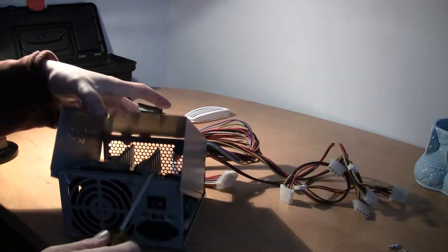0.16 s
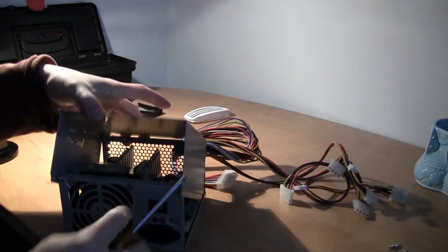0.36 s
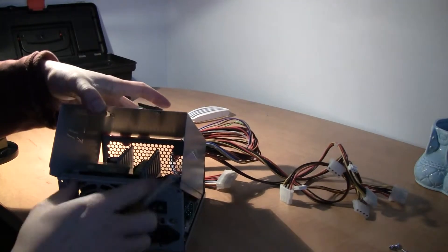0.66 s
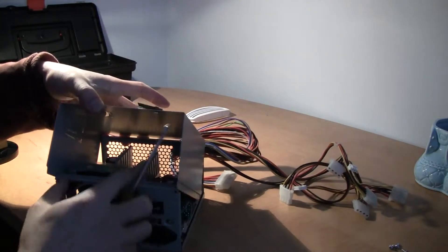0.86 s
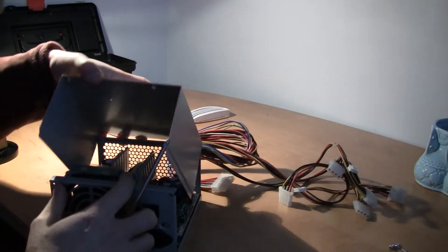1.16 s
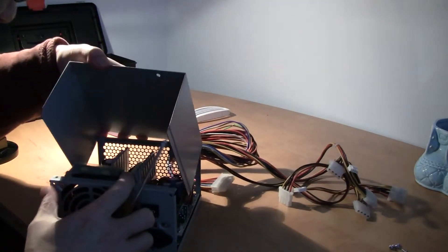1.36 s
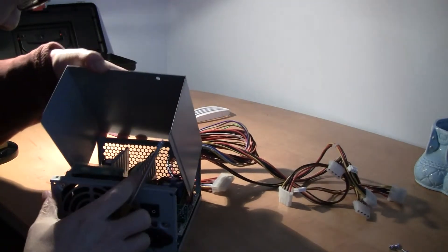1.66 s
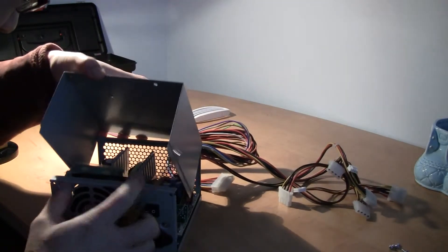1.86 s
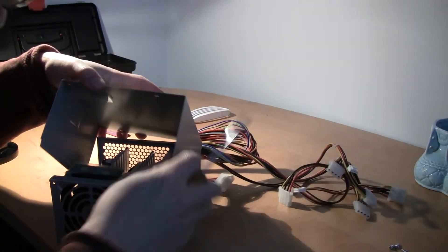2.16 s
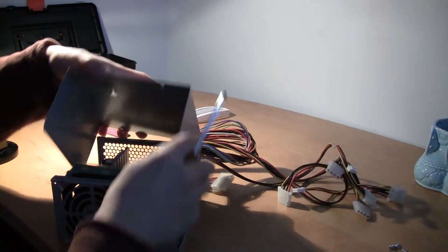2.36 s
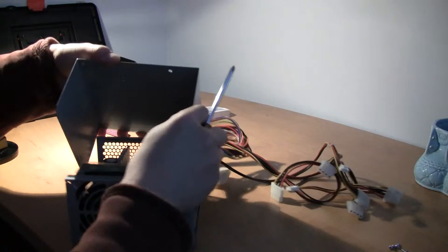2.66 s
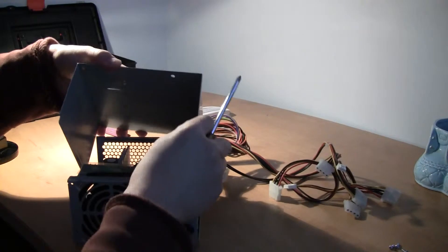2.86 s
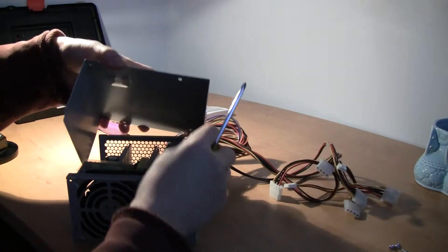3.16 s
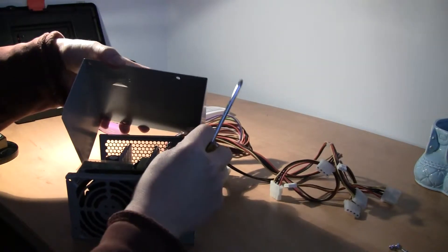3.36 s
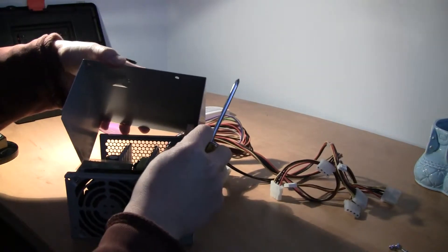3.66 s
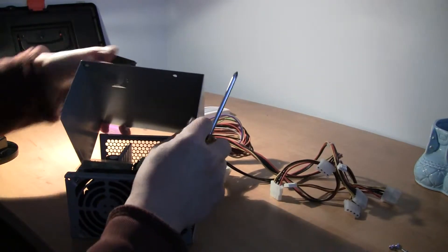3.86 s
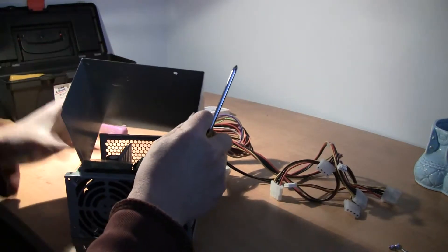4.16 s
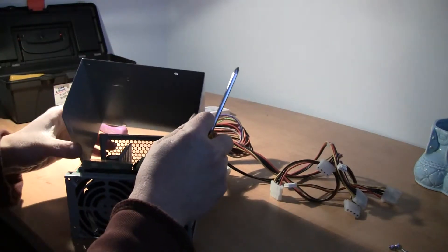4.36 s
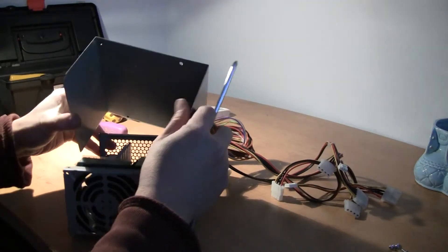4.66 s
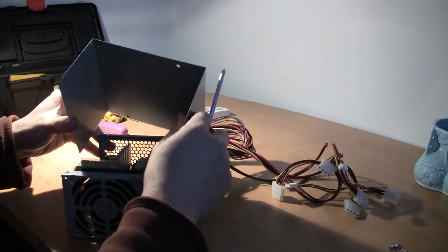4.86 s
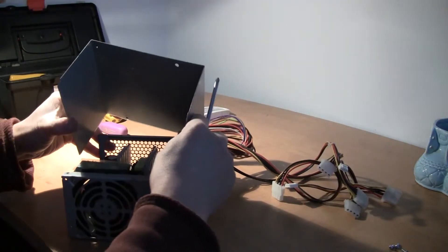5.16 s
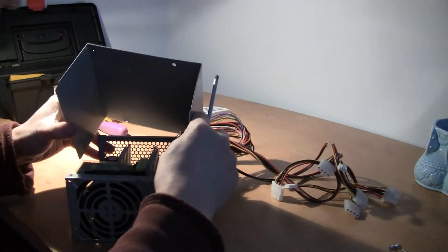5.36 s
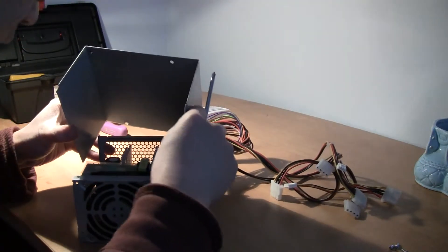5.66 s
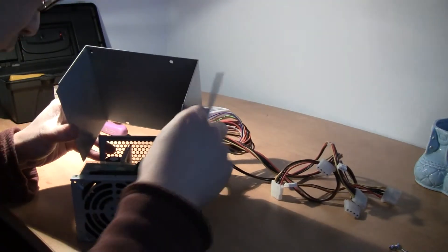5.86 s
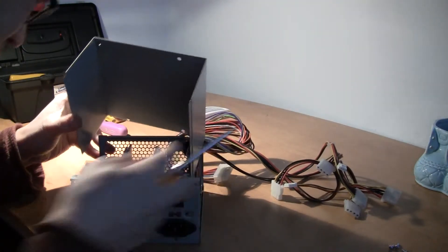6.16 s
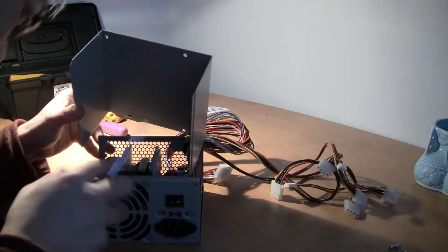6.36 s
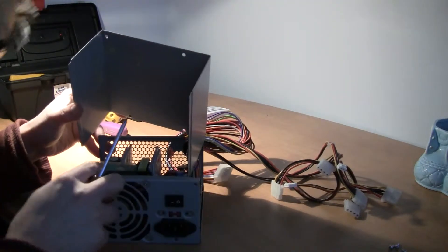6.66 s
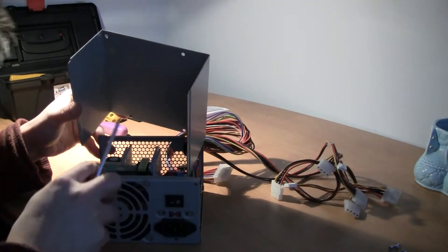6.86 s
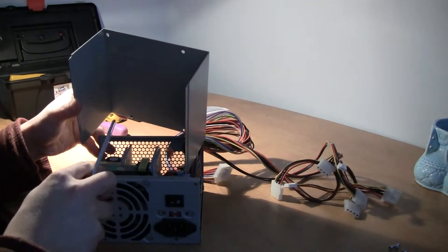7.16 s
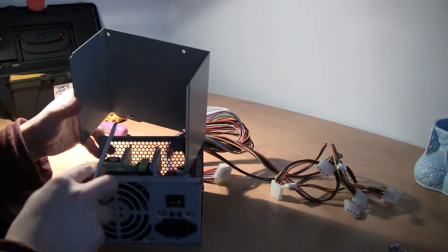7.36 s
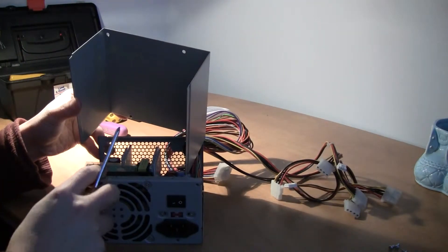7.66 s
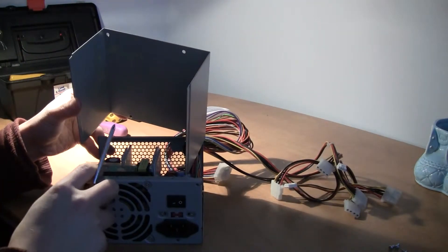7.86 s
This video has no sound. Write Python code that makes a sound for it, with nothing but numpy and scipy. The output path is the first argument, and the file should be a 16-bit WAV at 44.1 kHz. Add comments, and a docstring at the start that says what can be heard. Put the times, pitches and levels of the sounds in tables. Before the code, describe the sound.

A thin steel cover is worked off a small metal case on a wooden desk, heard close in a small bare room over a soft steady hiss. Light scrapes and clinks start at once, with a sharper catch at 0.6 seconds. From about 1 to 1.3 seconds the edges chatter in a cluster of bright, briefly ringing clinks. Hands rub softly on the sheet, then a clink and scrape come at 2.4 seconds and a dull desk bump at 2.7. Between 3 and 5 seconds the handling is quieter, with finger swishes, faint high squeaks, small ticks and short scrapes. A screwdriver knocks on the case at 5.1 seconds, and the cover rattles briefly just after. Two louder, ringing screwdriver knocks follow at about 6.2 and 6.9 seconds, and then only the hiss remains.

```python
"""Clinks and scrapes as a thin steel cover is worked off a small metal case on a wooden desk.
Edges catch, chatter and ring the sheet's modes; sliding steel sticks and slips, at times with a squeak.
Hands rub, swish and bump, and late on a screwdriver knocks three times on the stiffer case.
A small, bare room answers the contacts over a soft steady hiss."""
import sys
import numpy as np
from scipy import signal
from scipy.fft import rfft, irfft, next_fast_len
from scipy.io import wavfile
from scipy.ndimage import uniform_filter1d, map_coordinates

SR = 44100
rng = np.random.default_rng(int(sys.argv[2]) if len(sys.argv) > 2 else 0)


def wrap_up_sound(samples):
    """Save the sound to the file named by the first command line argument, as 16-bit audio."""
    columns = np.atleast_2d(samples).T
    # keep every value between -1 and 1, then stretch to whole-number steps
    tamed = np.clip(columns, -1, 1)
    steps = np.round(tamed * 32767).astype(np.int16)
    wavfile.write(sys.argv[1], SR, steps)


N = 352800
RING_N = SR // 2
RING_T = np.arange(RING_N) / SR

# steel modes: (frequency [Hz], level [dB], t60 [s])
COVER_MODES = [(215, -19, .2), (422, -10, .18), (502, -9, .21), (582, -10, .25), (722, -13, .16),
               (780, -16, .16), (925, -9, .21), (960, -8, .22), (1160, -16, .14), (1540, -6, .2),
               (1605, -7, .15), (1750, -3, .19), (1935, -14, .13), (2290, -13, .17), (2385, -12, .15),
               (2560, -14, .09), (2690, -17, .15), (2780, -19, .15), (3110, -15, .13), (3205, -10, .15),
               (3410, -18, .17), (3610, -9, .08), (3770, -7, .075), (3840, -12, .045), (4340, -14, .09),
               (4620, -17, .17), (5315, -16, .15), (5865, -14, .07), (6100, -16, .075), (6820, -17, .16),
               (6930, -14, .1), (7190, -9, .06), (7565, -16, .14), (8110, -13, .07), (10060, -17, .1),
               (11320, -17, .1), (11850, -18, .14), (13450, -21, .14)]
CASE_MODES = [(171.6, -7, .13), (213, -7, .17), (345, -2, .19), (507, -3, .26), (584, -4, .18),
              (717, -3.5, .18), (824, -7, .15), (1310, -5, .1), (1418, -5, .13), (1560, -3, .2),
              (1655, -5, .12), (1785, 0, .18), (2280, -11, .18), (3125, -8, .23), (3235, -9, .25),
              (3533, -6, .2), (3850, -5, .12), (4190, -6, .14), (5325, -9, .21), (7140, -5, .14),
              (7565, -10, .18), (8060, -4, .12), (8180, -7, .15), (9540, -8, .12), (9997, -5, .13),
              (10550, -7, .14), (11285, -3, .09), (13445, -14, .14)]
# contact spectra: (frequency [Hz], level [dB])
COVER_COLOUR = [(60, -36.5), (130, -45), (220, 0), (420, 3.5), (800, -1), (1200, -4), (1680, 11),
                (2200, 2.5), (2850, -1.5), (3700, 6.5), (5000, -2.5), (7600, -0.5), (9000, -2.5),
                (11300, 3), (14000, -2.5), (16000, -10)]
CASE_COLOUR = [(60, -24), (120, -18), (200, 0.5), (330, 4.5), (450, 2), (720, 7), (950, 7), (1400, 9),
               (1800, 5.5), (2500, -2), (3400, 1), (4000, 2), (4700, -4.5), (7600, -1), (9000, -2.5),
               (11300, 3), (13500, 1.5), (16000, -9)]
# stereo width of skin noise: (frequency [Hz], side minus mid [dB])
SKIN_WIDTH = [(100, -19), (400, -24), (1500, -20), (6000, -3)]


def amp(db):
    """dB to gain."""
    return 10 ** (np.asarray(db) / 20)


def unit(x):
    """Scale to rms 1."""
    return x / np.sqrt(np.mean(x ** 2) + 1e-20)


def along(points, hz):
    """Interpolate (frequency [Hz], value) points on a log axis."""
    knots_hz, values = np.transpose(points)
    return np.interp(np.log(hz + 1), np.log(knots_hz + 1), values)


def filtered(x, response):
    """Apply the gain response(hz) by FFT."""
    n = x.shape[-1]
    n_fft = next_fast_len(n + 4096)
    return irfft(rfft(x, n_fft) * response(np.fft.rfftfreq(n_fft, 1 / SR)), n_fft)[..., :n]


def coloured(x, colour):
    """Apply a (frequency [Hz], level [dB]) curve."""
    return filtered(x, lambda hz: amp(along(colour, hz)))


def add(track, start_s, sound):
    """Mix sound into track from start_s on."""
    start = round(start_s * SR)
    part = sound[:, max(-start, 0):N - start]
    track[:, max(start, 0):][:, :part.shape[1]] += part


def diffuse(colour, width, n):
    """Stereo noise from all sides, mid rms 1."""
    mid, side = coloured(rng.standard_normal((2, n)), colour)
    side = coloured(side, width)
    return np.array([mid + side, mid - side]) / np.std(mid)


def room_hiss():
    """Steady diffuse room noise."""
    # spectrum: (frequency [Hz], density [dB])
    colour = [(15, -40), (25, -18), (70, -15), (94, -9), (223, -0.5), (263, -0.5), (317, 1.5), (476, -3),
              (516, 1), (624, -4), (818, -3), (3620, -16), (4740, -20), (11600, -29.5), (16000, -36.5)]
    # stereo width: (frequency [Hz], side minus mid [dB])
    width = [(60, -11), (130, -2.5), (290, 4.5), (640, 6.5), (1410, 2.5), (3100, -0.5), (6820, -3),
             (15000, 1)]
    return amp(-58.5) * diffuse(colour, width, N)


def mic_pair(hz, lobe_hz=300, beaming_per_10khz=.11):
    """Left and right gains: modes beam in different directions, more unevenly in the treble."""
    # balance: (frequency [Hz], left minus right [dB])
    lean = [(60, -2.5), (110, 3.5), (200, 1), (380, 0.5), (700, 0), (1290, 0), (2380, 0.5), (4400, -0.5),
            (8120, -1), (15000, 2.5)]
    # phase: (frequency [Hz], left lead [rad])
    lead = [(100, 0.34), (2000, 0.098), (4000, 0.192), (7000, .8), (11000, 1.1), (15000, 1.7)]
    knots = rng.standard_normal((2, SR // lobe_hz))
    level, phase = (map_coordinates(row, [hz / lobe_hz]) for row in knots)
    lobes = np.exp(beaming_per_10khz * hz / 10000 * (level + 1j * phase))
    left = amp(along(lean, hz) / 2) * np.exp(.5j * along(lead, hz)) * lobes
    return np.array([left, 1 / left])


def in_room(x, wet_db=0, build_s=0.00098, widen_s=.05):
    """Direct sound plus a fresh room tail that dies sooner in the treble."""
    # decay: (frequency [Hz], t60 [s])
    decay = [(150, 0.31), (700, 0.37), (3000, 0.32), (8000, 0.33), (14000, 0.22)]
    # tail spectrum: (frequency [Hz], level before wet_db [dB])
    colour = [(150, 8), (500, 1), (1500, -6), (5000, -13), (12000, -17)]
    # late tail width: (frequency [Hz], side minus mid [dB])
    width = [(100, -9.5), (300, -23), (700, -7.5), (1500, -8.5), (4000, -6), (12000, 4)]
    hz, t, bins = signal.stft(diffuse([(20, 0), (20000, 0)], width, RING_N), SR, nperseg=256)
    mid = bins.mean(axis=0)
    bins = mid + (bins - mid) * (1 - np.exp(-t / widen_s))  # desk echoes first, then all around
    fade = amp(-60 * t / along(decay, hz)[:, None]) * (1 - np.exp(-t / build_s))
    fade *= amp(along(colour, hz))[:, None] / np.sqrt(RING_N * np.mean(fade ** 2, axis=1, keepdims=True))
    tail = signal.istft(bins * fade, SR, nperseg=256)[1]
    echo = signal.fftconvolve(x[None], tail, axes=1)[:, :len(x)]
    return filtered(x, mic_pair) + amp(wet_db) * echo


def radiated(x):
    """A small open sheet radiates almost no bass."""
    return signal.sosfilt(signal.butter(3, 140, "high", fs=SR, output="sos"), x)


def voiced(x, level_db, tilt_db_oct, thud_db, bite_db):
    """Set the crest of four bands: hard contacts tilt up, heavy ones thud, sharp edges bite."""
    octaves = np.log2(np.array([1300, 3900, 10000]) / 1300)  # upper three bands
    crests_db = level_db + np.append(thud_db, tilt_db_oct * octaves) + [0, 0, bite_db, 0]
    out = 0
    for split_hz, db in zip((700, 2500, 6000, None), crests_db):
        band = x
        if split_hz:
            crossover = [signal.butter(2, split_hz, kind, fs=SR, output="sos") for kind in ("low", "high")]
            band, x = (signal.sosfilt(np.tile(sos, (2, 1)), x) for sos in crossover)
        crest_power = uniform_filter1d(np.mean(band ** 2, axis=0), size=441).max()
        out = out + band * amp(db) / np.sqrt(crest_power + 1e-20)
    return out


def dense_modes(t60_s, colour=COVER_COLOUR):
    """Short-lived bending modes, too close to tell apart: decaying noise."""
    return amp(-60 * RING_T / t60_s) * unit(coloured(rng.standard_normal(RING_N), colour))


def ringing(modes, scatter_db=2.5):
    """Lasting modes, with new levels and phases at each contact."""
    hz, db, t60_s = np.transpose(modes)[:, :, None]
    db = db + rng.normal(0, scatter_db, hz.shape)
    phase = 2 * np.pi * (hz * RING_T + rng.random(hz.shape))
    return np.sum(amp(db - 60 * RING_T / t60_s) * np.sin(phase), axis=0)


def singing(modes, struck, push, blur_hz=4.9):
    """Modes with an antinode at the contact ring out; struck: (frequency [Hz], level [dB])."""
    if not struck:
        return 0
    out = 0
    for near_hz, db in struck:
        hz, _, t60_s = min(modes, key=lambda mode: abs(mode[0] - near_hz))
        energy = signal.lfilter([1], [1, -amp(-60 / (t60_s * SR)) ** 2], push ** 2)
        linewidth_hz = blur_hz + .004 * hz  # loose contact blurs the mode
        drift = uniform_filter1d(rng.standard_normal(len(push)), size=200)
        phase = np.cumsum(2 * np.pi * hz / SR + np.sqrt(2 * np.pi * linewidth_hz / SR) * drift)
        out = out + amp(db) * np.sqrt(energy / energy.max()) * np.sin(phase)
    return in_room(radiated(out), wet_db=-7.5)  # drier, so the tones sound clear and steady


def swell(rise_s, fall_s):
    """Slide pressure: up 60 dB, then down."""
    t = np.arange(2 * RING_N) / SR - rise_s
    return amp(-60 * np.maximum(-t / rise_s, t / fall_s))


def slips(n, rate_hz, spread_db):
    """Stick-slip jerks of random time and size."""
    jerks = (rng.random(n) < rate_hz / SR) * rng.standard_normal(n)
    return jerks * amp(spread_db * rng.standard_normal(n))


def chatter(span_s, rebound=0.89, count=5):
    """First touch, then ever weaker rebounds within span_s."""
    when = np.append(0, rng.uniform(0, 1, count))
    size = np.append(1, rebound * (1 - when[1:]))
    return np.bincount((when * span_s * SR).astype(int), size, RING_N)


def clack(span_s, t60_s, colour, cutoff_hz):
    """Chatter drives the dense modes up to a cut-off set by contact hardness."""
    bins = rfft(signal.fftconvolve(chatter(span_s), dense_modes(t60_s, colour))[:RING_N])
    hz = np.fft.rfftfreq(RING_N, 1 / SR)
    whitened = bins / np.sqrt(np.abs(uniform_filter1d(np.abs(bins) ** 2, size=130)) + 1e-12)
    softness = np.sqrt(1 + (hz / cutoff_hz) ** 10)
    sound = irfft(whitened * amp(along(colour, hz)) / softness, RING_N)
    return unit(sound * (RING_T < RING_T[-1] / 2))


def blows(contacts, modes, colour, dense_t60_s, ring_db, attack_s, wet_db, gain_db):
    """Each contact chatters and sets steel and room ringing."""
    out = np.zeros((2, N))
    for time_s, level_db, tilt_db_oct, thud_db, bite_db, cutoff_hz, span_s, struck in contacts:
        hit = clack(span_s, dense_t60_s, colour, cutoff_hz) + amp(ring_db) * unit(ringing(modes))
        hit *= 1 - np.exp(-RING_T / attack_s)
        hit = voiced(in_room(radiated(hit), wet_db), level_db + gain_db, tilt_db_oct, thud_db, bite_db)
        push = np.exp(-RING_T / (0.27 * span_s))  # panels take up energy early in the chatter
        add(out, time_s, hit + singing(modes, struck, push))
    return out


def finger_swishes():
    """Dry skin glides over the flat sheet with a soft hiss."""
    # glides: (peak time [s], rise [s], fall [s], level [dB])
    glides = [(2.99, .25, .25, -74), (3.63, 0.28, .33, -59)]
    # spectrum: (frequency [Hz], density [dB])
    colour = [(800, -25), (2000, -7), (2600, -2), (3200, 3), (4200, -10), (6000, -22), (12000, -35)]
    out = np.zeros((2, N))
    for peak_s, rise_s, fall_s, db in glides:
        pressure = swell(rise_s, fall_s)
        add(out, peak_s - rise_s, amp(db) * pressure * diffuse(colour, SKIN_WIDTH, len(pressure)))
    return out


def grip(start_s, hold_s, attack_s=0.046, release_t60_s=0.4):
    """Pressure of one finger stroke: tighten, hold, release."""
    t = np.arange(N) / SR - start_s
    return np.clip(1 + t / attack_s, 0, 1) * amp(-60 * np.clip((t - hold_s) / release_t60_s, 0, 2))


def waver(depth_db=1.43, rate_hz=18):
    """Random gain of uneven finger pressure."""
    position = np.arange(N) * rate_hz / SR
    return amp(depth_db * map_coordinates(rng.standard_normal(int(position[-1]) + 2), [position]))


def hand_rubs(ring_db=-17):
    """Skin rubs dully on the sheet; its raw edge gives a fine crackle."""
    # grip changes: (start [s], hold [s], rub [dB], grit [dB])
    strokes = [(0.197, 0.053, -65, -55.5), (0.572, 0.022, -49.5, -57), (0.936, 0.096, -45.5, -54),
               (1.146, 0.17, -81, -56), (1.51, 0.094, -74, -64.5), (1.797, 0.26, -67, -69),
               (2.205, 0.21, -59.5, -64.5), (2.515, 0.22, -48.5, -62.5), (2.873, 0.19, -79, -71),
               (3.122, 0.08, -55.5, -80), (3.382, 0.033, -61, -63), (3.607, 0.35, -59, -65.5),
               (4.427, 0.28, -59.5, -62.5), (4.878, 0.13, -77, -65.5), (5.16, 0.36, -64.5, -77),
               (5.696, 0.34, -64.5, -76), (6.096, 0.021, -71, -67), (6.684, 0.025, -75.5, -63)]
    # spectra: (frequency [Hz], density [dB])
    rub_colour = [(47, -56), (80, -23), (135, -32), (216, -0.5), (371, -2.5), (594, -0.5), (650, -0.5),
                  (1600, -4), (2480, -17.5), (6000, -29.5), (7800, -69), (13200, -120)]
    grit_colour = [(700, -27.5), (1200, 9), (2000, -2.5), (3500, 2), (5200, -1), (8000, 2.5), (11500, 0),
                   (14000, -1.5), (16000, -8)]
    rub_gain, grit_gain = waver() * sum(amp([[rub_db], [grit_db]]) * grip(start_s, hold_s)
                                        for start_s, hold_s, rub_db, grit_db in strokes)
    sheet = dense_modes(t60_s=0.076) + amp(ring_db) * ringing(COVER_MODES)
    crackle = signal.fftconvolve(slips(N, rate_hz=500, spread_db=4), sheet)[:N]
    grit = unit(in_room(coloured(crackle, grit_colour)))
    return rub_gain * diffuse(rub_colour, SKIN_WIDTH, N) + grit_gain * grit


def desk_bumps(tilt_db_oct=-30, cutoff_hz=4100, span_s=0.00297):
    """Hand and case meet the desk: soft contacts, little treble."""
    # bumps: (time [s], level [dB], thud [dB])
    bumps = [(0.266, -39, -4.5), (.811, -62, 15), (1.645, -50.5, 5.5), (2.6945, -38, 3),
             (2.713, -48.5, 7.5), (2.741, -57, 12.5), (3.244, -53, 7.5), (3.359, -54, 11),
             (3.383, -59.5, 12), (3.441, -53.5, 1.5), (4.743, -58.5, 8.5), (5.573, -56.5, 7.5),
             (5.756, -62, 12)]
    contacts = [(time_s, db, tilt_db_oct, thud_db, 0, cutoff_hz, span_s, [])
                for time_s, db, thud_db in bumps]
    return blows(contacts, CASE_MODES, CASE_COLOUR,
                 dense_t60_s=0.064, ring_db=-21, attack_s=0.00026, wet_db=0, gain_db=-2.5)


def edge_squeaks():
    """A slipping edge drives one or two high modes."""
    # squeaks: (peak time [s], rise [s], fall [s], struck modes [(frequency [Hz], level [dB])])
    squeaks = [(2.52, .12, .1, [(13450, -67)]), (2.96, 0.17, 0.11, [(11850, -76), (13450, -76)]),
               (3.645, 0.28, 0.088, [(13450, -61)])]
    out = np.zeros((2, N))
    for peak_s, rise_s, fall_s, struck in squeaks:
        add(out, peak_s - rise_s, singing(COVER_MODES, struck, swell(rise_s, fall_s), blur_hz=60))
    return out


def cover_scrapes(ring_db=-8, thud_db=-9, gain_db=-1):
    """The lip drags over the case: a swell of slips rings the sheet but hardly moves it as a whole."""
    # slides: (peak time [s], rise [s], fall [s], level [dB], tilt [dB/oct], bite [dB],
    # struck modes [(frequency [Hz], level [dB])])
    slides = [(0.017, 0.23, 0.24, -38, -1.5, 1.5, [(925, -40.5), (5865, -45)]),
              (.23, .1, 0.057, -41.5, -3.5, -3, [(925, -47.5), (1750, -39.5), (2780, -49.5), (3610, -46),
              (4620, -54)]), (.335, 0.12, 0.081, -43, -4.5, -2, [(925, -44), (1750, -58), (1935, -52),
              (2290, -51), (2690, -54), (3770, -53), (4620, -54)]),
              (.423, 0.19, 0.18, -48.5, -5, -7, [(925, -59), (1750, -50.5), (2690, -61), (4620, -63)]),
              (.967, 0.14, .049, -41, -1, 3.5, [(960, -38.5), (1750, -34.5)]),
              (2.414, 0.053, 0.015, -46, -3, -2, []), (2.49, 0.14, 0.12, -58, -2.5, -2, [(1750, -57),
              (3770, -64)]), (2.573, 0.074, 0.14, -58, -0.5, 3.5, [(1605, -55), (3770, -68)]),
              (3.835, 0.15, 0.017, -51, -2, -4, [(780, -46.5), (1160, -54), (1750, -54), (2385, -54.5),
              (3770, -56)]), (4.463, 0.13, 0.066, -55, -6, 1, [(1750, -57), (3770, -63)]),
              (2.98, .33, 0.37, -73, -1.5, 6, [(3610, -69), (3770, -70)]),
              (4.905, .15, 0.083, -63.5, -1.5, 0, [(1935, -63), (3770, -71)])]
    # sliding force, softer than a blow: (frequency [Hz], level [dB])
    drag_colour = [(100, -30), (6500, 2), (11000, 0.5), (13000, -7), (16000, -8)]
    out = np.zeros((2, N))
    for peak_s, rise_s, fall_s, level_db, tilt_db_oct, bite_db, struck in slides:
        pressure = swell(rise_s, fall_s)
        drag = coloured(pressure * slips(len(pressure), rate_hz=9000, spread_db=7), drag_colour)
        sheet = dense_modes(t60_s=0.078) + amp(ring_db) * ringing(COVER_MODES)
        scrape = signal.fftconvolve(drag, sheet)[:len(drag)]
        scrape = voiced(in_room(radiated(scrape)), level_db + gain_db, tilt_db_oct, thud_db, bite_db)
        add(out, peak_s - rise_s, scrape + singing(COVER_MODES, struck, pressure))
    return out


def screwdriver_knocks():
    """The tool strikes and rings the stiff case."""
    # knocks: (time [s], level [dB], tilt [dB/oct], thud [dB], bite [dB], cut-off [Hz], chatter [s],
    # struck modes [(frequency [Hz], level [dB])])
    knocks = [(5.1032, -30.5, -0.5, -10, 1.8, 13100, 0.0091, [(345, -42.5), (507, -45), (717, -43),
              (1310, -45), (1560, -60), (1785, -42), (2280, -45), (3125, -48.5), (3850, -46)]),
              (6.213, -25.5, 1, -7.5, 0.61, 9900, .011, [(345, -42.5), (717, -38.5), (1418, -40),
              (1785, -27.5), (3533, -48), (3850, -37), (4190, -42), (5325, -42), (8060, -41)]),
              (6.9298, -26, 4, -2, -0.85, 16000, .015, [(213, -44.5), (345, -40), (507, -40), (584, -38.5),
              (1655, -32.5), (1785, -26.5), (3125, -37.5), (3235, -43.5), (3533, -40), (4190, -44),
              (5325, -42.5), (7140, -42), (8060, -35), (9540, -36), (9997, -31), (11285, -24)])]
    return blows(knocks, CASE_MODES, CASE_COLOUR,
                 dense_t60_s=0.031, ring_db=-13, attack_s=0.0004, wet_db=0.5, gain_db=-6)


def cover_clinks():
    """The edges catch and let go, ringing the thin sheet."""
    # clinks: (time [s], level [dB], tilt [dB/oct], thud [dB], bite [dB], cut-off [Hz], chatter [s],
    # struck modes [(frequency [Hz], level [dB])])
    clinks = [(.003, -43.5, 2, 1, 7, 11100, 0.0036, [(502, -34), (1605, -38), (1935, -54), (2290, -39)]),
              (.221, -40.5, -7.5, 1.5, 11, 9000, 0.0047, [(422, -51), (502, -55), (925, -43.5)]),
              (.566, -38, -2.5, -20, 7, 10500, 0.0094, [(7190, -37)]),
              (.569, -34.5, -4, -10, 4.5, 9800, 0.013, [(422, -52), (582, -39), (925, -34.5), (1540, -44),
              (1750, -34.5), (3110, -47), (3770, -48)]), (.892, -60.5, 2.5, 12, 0, 15000, 0.011, []),
              (.972, -27.5, -2.5, -4, 2.5, 13000, 0.0092, [(215, -45), (722, -37), (960, -30),
              (1540, -32)]), (.977, -39, -1.5, 2.5, -2, 13000, 0.004, [(2385, -36), (3205, -27.5),
              (3610, -37), (6930, -36)]), (1.119, -34, 1.5, -7, 5.5, 13900, 0.013, [(422, -46),
              (502, -38.5), (960, -38), (1605, -32.5), (1750, -37), (2385, -41), (3610, -30), (3770, -35),
              (6100, -34), (6930, -40), (7565, -44)]), (1.195, -56, 3, -16, 6, 6000, 0.009, [(2780, -55)]),
              (1.2185, -29, 0.9, -8, 3, 15000, 0.004, [(422, -34.5), (502, -42), (722, -42), (1750, -45),
              (2560, -32.5), (3205, -39), (3770, -36), (4340, -40), (5865, -39), (7190, -31)]),
              (1.2645, -28, -1.5, -8.5, 7.5, 14900, 0.0045, [(960, -42), (1540, -49), (1750, -27),
              (3205, -42), (3770, -34), (5315, -48), (7190, -43)]),
              (1.329, -35, -0.1, -4.5, -3.5, 13900, 0.0088, []), (1.453, -54.5, 2, 2, 7, 15000, 0.0065, []),
              (2.247, -45.5, -2.5, -12, -0.5, 15000, 0.0039, []),
              (2.414, -32, 1, -10, -2, 15700, 0.005, [(1540, -42), (1750, -52), (3110, -47), (3410, -50),
              (3770, -42), (6930, -45), (8110, -32.5)]), (2.68, -62.5, 6, -8, -1, 16000, 0.0043, []),
              (3.36, -73, 6.5, 3, -11, 16000, 0.0075, []), (3.467, -71.5, 6, -1, -7, 16000, 0.0041, []),
              (3.555, -71, 4.5, -7, -4, 15400, .008, []),
              (3.685, -42.5, -14, -26, 0, 8950, 0.0043, [(1750, -56)]),
              (3.726, -52, -5.5, 4, 7, 12000, 0.0035, [(502, -50), (2560, -58)]),
              (3.913, -46, -1, -2.5, -1, 15000, 0.0075, [(780, -55), (960, -53), (1160, -48), (2560, -53),
              (3770, -52)]), (4.422, -49, -20, 1.5, -3, 9000, 0.015, []),
              (4.481, -49, 0, 5, -2, 15000, 0.008, [(11850, -66)]),
              (4.533, -63.5, 6, -7, -8, 16000, 0.012, []),
              (4.569, -47, 4, -14, -15, 16000, 0.00072, [(11850, -49)]),
              (5.215, -40.5, -6, -8, -5, 12000, 0.0049, [(3840, -46)]),
              (5.244, -49, -6.5, -9, 6, 12000, 0.0055, [(3840, -58)]),
              (5.291, -48, -3.5, -18, -8, 14000, 0.015, []),
              (5.341, -31, -14, -20, 9, 9000, 0.005, [(502, -50), (582, -48), (722, -44), (780, -40),
              (1160, -45), (2560, -53), (1540, -39), (1750, -45), (3840, -39.5)]),
              (5.361, -35.5, -9, -6, 2, 9000, 0.011, []),
              (5.375, -36, -7.5, -14, -1, 12000, 0.017, [(722, -45), (3840, -43)]),
              (5.696, -65, 2.5, -8, -4, 15000, 0.0044, []),
              (5.901, -53, -5, -10, 4, 14000, .005, [(3840, -59)]),
              (6.598, -60.5, -2.5, 0, 8, 14000, .005, [])]
    return blows(clinks, COVER_MODES, COVER_COLOUR,
                 dense_t60_s=0.029, ring_db=-6.5, attack_s=0.00081, wet_db=-1.5, gain_db=-6.5)


def scene():
    """Impacts and friction over the room's hiss."""
    impacts = cover_clinks() + screwdriver_knocks() + desk_bumps()
    friction = cover_scrapes() + edge_squeaks() + hand_rubs() + finger_swishes()
    return impacts + friction + room_hiss()


def record(dry):
    """Steep band limit."""
    top_hz, edge_hz = 16200, 400
    return filtered(dry, lambda hz: np.clip((top_hz - hz) / edge_hz + .5, 0, 1))


dry = scene()
out = record(dry)
wrap_up_sound(out)
```